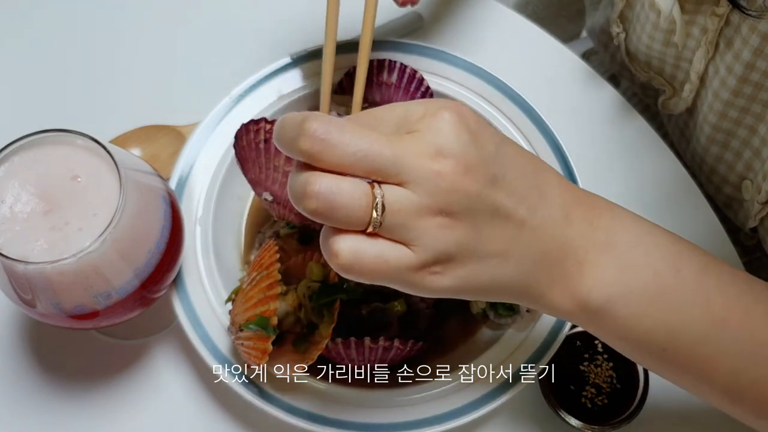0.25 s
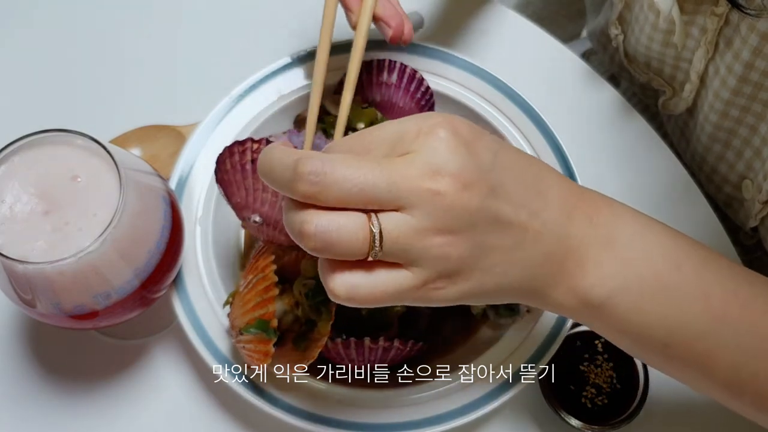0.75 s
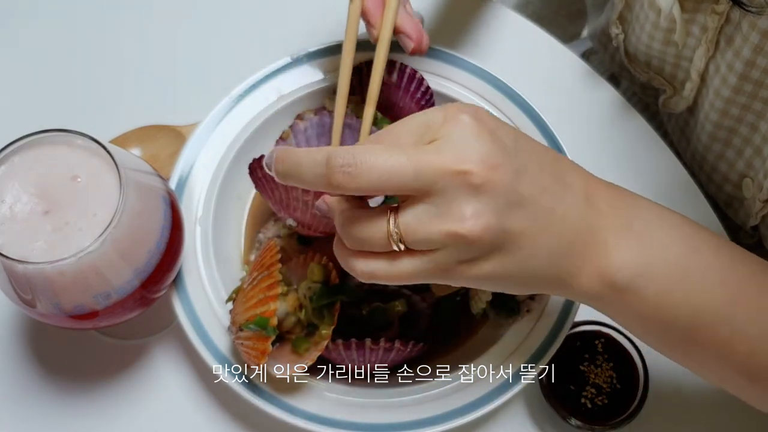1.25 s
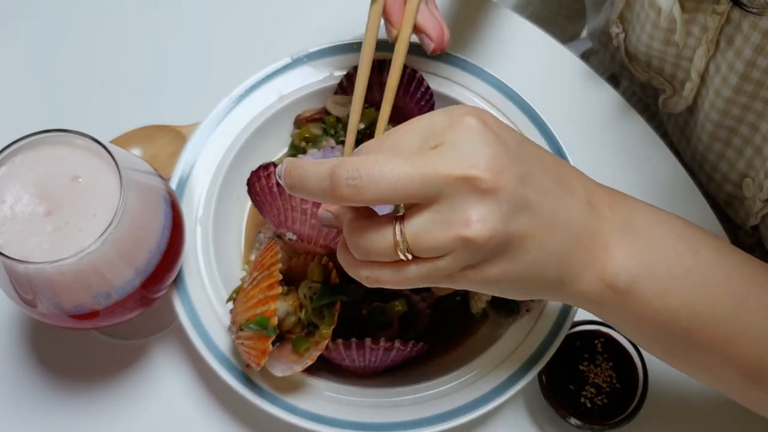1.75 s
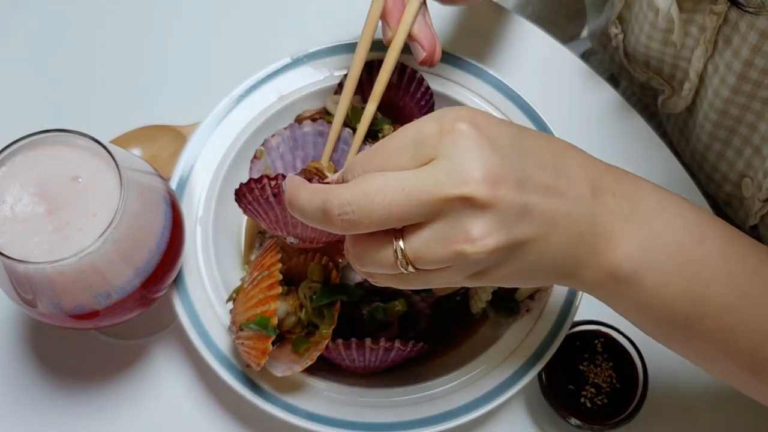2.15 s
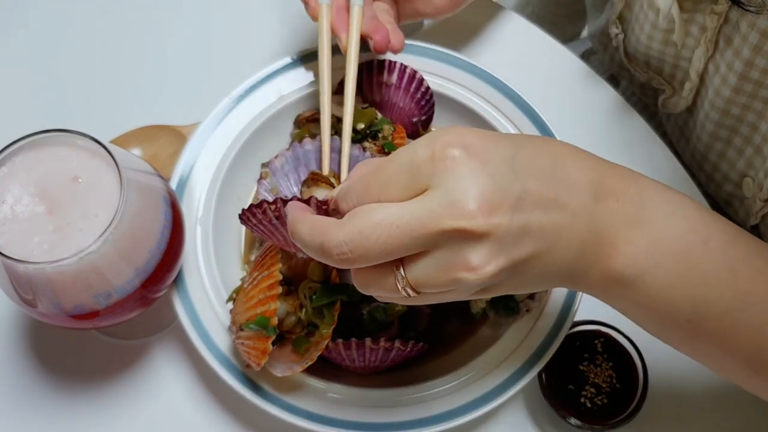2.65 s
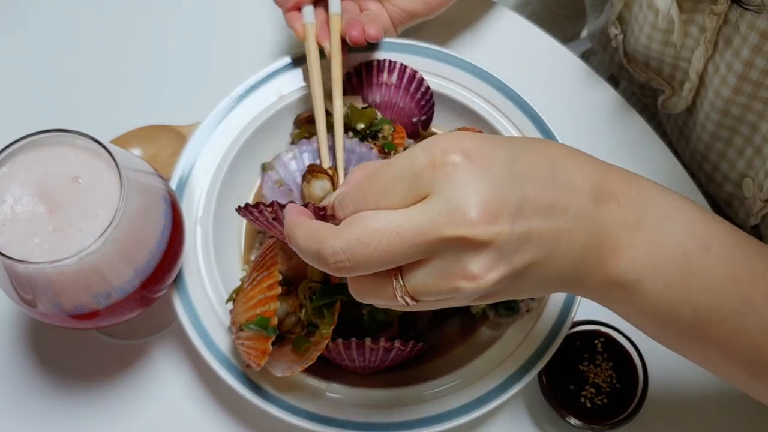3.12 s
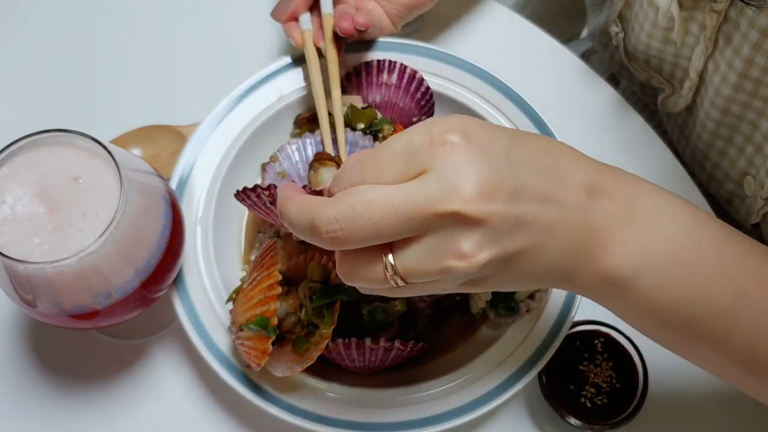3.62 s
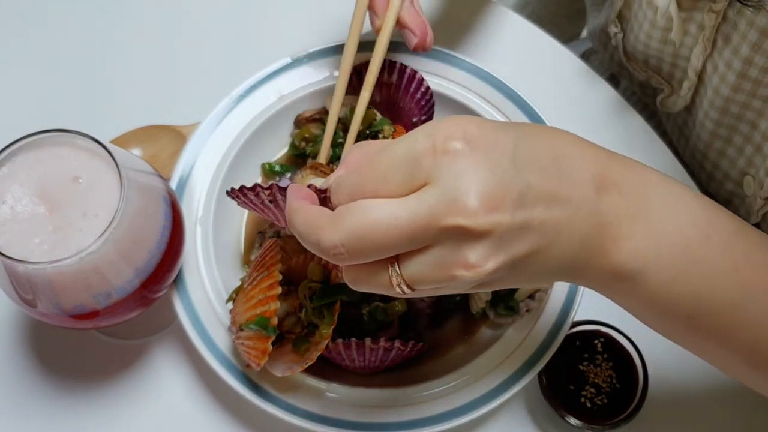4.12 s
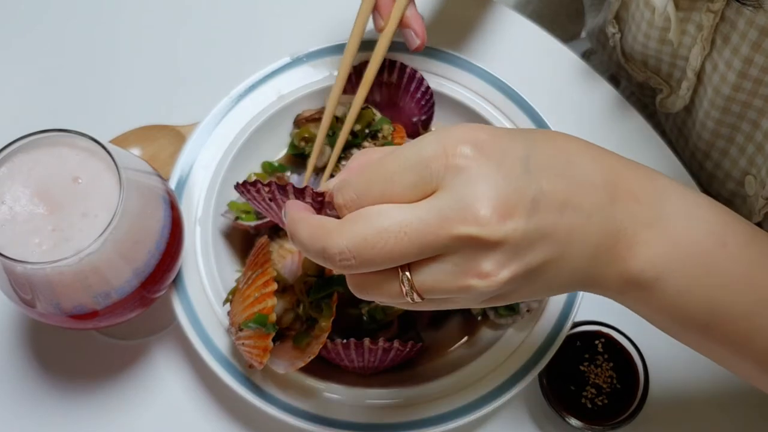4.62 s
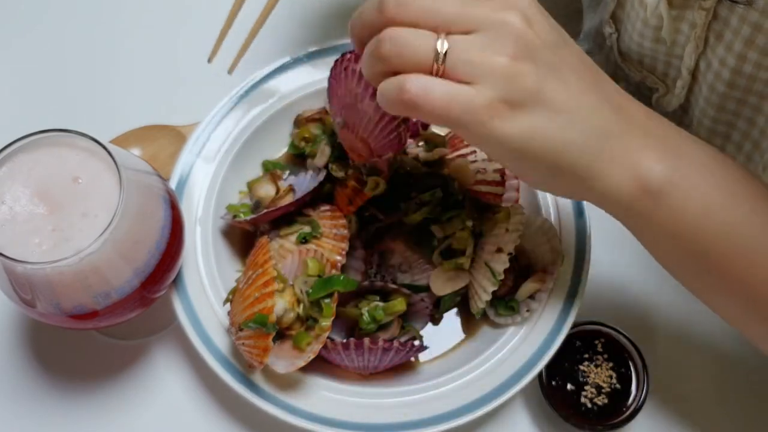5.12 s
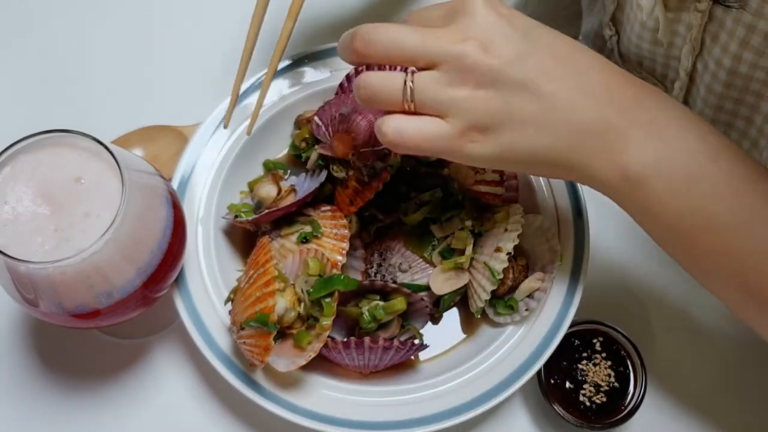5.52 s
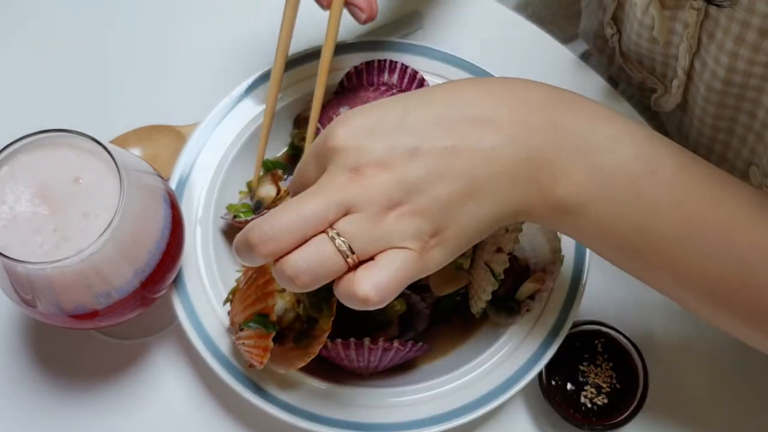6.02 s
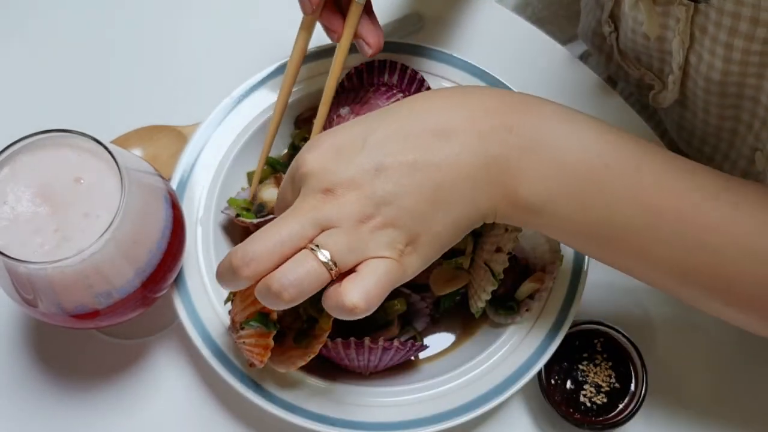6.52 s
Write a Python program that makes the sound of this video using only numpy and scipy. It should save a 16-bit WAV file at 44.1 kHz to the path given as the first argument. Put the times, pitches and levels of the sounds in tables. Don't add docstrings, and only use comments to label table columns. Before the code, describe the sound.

A close stereo microphone hears shellfish shells on a ceramic plate, slightly left, in a small room with a very short answer. Faint room air, hiss, low hum and a thin far appliance whine continue throughout. From 0.5 to 0.9 s there are dull, woody clacks and a short drag. Light rim ticks follow near 1.3 s, with a tiny chirp at 1.76 s, then barely audible nudges until a clearer tick at 3.1 s. The hum swells briefly at 3.3 s. From 3.95 to 4.25 s bright ticks, ratcheting scrapes and hard clacks crowd together, and the loudest, sharp shell crack lands at 4.33 s with an instant rebound. A faint nudge follows at 4.65 s. Crisp ticks and small knocks come at 5.1 s, a strong bright clack at 5.46 s, then soft clacks at 6.2 and 6.4 s and slow rustling taps near 6.7 s.

```python
import sys
import numpy as np
from scipy import signal
from scipy.fft import rfft, irfft, next_fast_len
from scipy.io import wavfile
from scipy.ndimage import map_coordinates

SR = 44100
rng = np.random.default_rng(int(sys.argv[2]) if len(sys.argv) > 2 else 0)


def put_to_file(sound):
    columns = np.atleast_2d(sound).T
    safe = np.clip(columns, -1, 1)
    whole_steps = np.round(safe * 32767)
    wavfile.write(sys.argv[1], SR, whole_steps.astype(np.int16))


def elevation(decibels):
    levels = np.asarray(decibels, float)
    return 10 ** (levels / 20)


N = 298116
LAG = 6
PLATE_PAN = elevation([[2.2], [-2.2]])


def unit(x):
    return x / np.sqrt(np.mean(x ** 2) + 1e-20)


def along(points, hz):
    f, v = np.transpose(points)
    return np.interp(np.log(hz + 1), np.log(f + 1), v)


def wobble(rate):
    knots = rng.standard_normal(int(N * rate / SR) + 4)
    return map_coordinates(knots, [np.arange(N) * rate / SR])


def filtered(x, response):
    m = next_fast_len(N + SR // 2)
    return irfft(rfft(x, m) * response(np.fft.rfftfreq(m, 1 / SR)), m)[..., :N]


def resonances(peaks):
    def response(f):
        total = 0
        for k, (centre, width, db) in enumerate(peaks):
            band = 1j * f * width / (centre * centre - f * f + 1j * f * width)
            total = total + (-1) ** k * elevation(db) * band
        return total
    return response


# frequency in Hz, left-right likeness (1 = same).
LIKENESS = [(60, 0.97), (180, 0.41), (550, -0.46), (1650, 0.05), (4970, -1.1), (15000, 0.34)]


def rush(spectrum):
    below, above = (spectrum[0][0] * .8, -120), (spectrum[-1][0] * 1.05, -120)
    closed = [below] + list(spectrum) + [above]

    def mid_side(hz):
        turn = np.arccos(np.clip(along(LIKENESS, hz), -2 / 3, 1)) / 2
        return elevation(along(closed, hz)) * [np.cos(turn), np.sin(turn)]

    mid, side = filtered(rng.standard_normal((2, N)), mid_side)
    return np.array([mid + side, mid - side]) / np.std(mid)


# frequency in Hz, level in dB per Hz.
AIR_COLOUR = [(140, -12.5), (235, -12), (275, -27), (387, -24.5), (464, -19), (640, -17), (720, -21),
              (932, -32.5), (1650, -36), (1920, -29.5), (2250, -34), (4160, -37.5), (14900, -40.5),
              (16300, -52)]
RUMBLE_COLOUR = [(15, -30), (30, -22.5), (45, -15.5), (60, 0), (85, -5), (110, -22)]
HUM_COLOUR = [(80, -26), (100, -8), (118, 4.5), (140, -7), (170, -25.5)]
# frequency in Hz, level in dB rms.
MOTOR_LINES = [(559.9, -88), (646.0, -78.5), (1292, -102), (1351, -100), (2013, -100)]
# time in seconds, width in seconds, hum gain in dB, rumble gain in dB.
TABLE_LEANS = [
    (.86, 0.059, -1, 12),
    (2.9, 0.14, 3.5, 4),
    (3.319, 0.098, 17, -0.5),
    (4.1, .1, 7, 9.5),
    (4.35, .15, 7, 7),
    (5.0, .1, -3.5, 5),
    (5.35, 0.16, 9, 4),
    (6.34, .2, -0.5, 4.5),
]
# frequency in Hz, left over right in dB.
BACKGROUND_BALANCE = [(60, -0.5), (300, -0.5), (700, 2.5), (8000, 2.5)]


def background():
    t = np.arange(N) / SR
    s, width, *gains_db = np.transpose(TABLE_LEANS)
    hum_db, rumble_db = gains_db @ np.exp(-((t - s[:, None]) / width[:, None]) ** 2)
    air = elevation(-76 + 0.4 * wobble(2.3)) * rush(AIR_COLOUR)
    hum = elevation(-72.5 + hum_db + wobble(8)) * rush(HUM_COLOUR)
    rumble = elevation(-73 + rumble_db + 1.0 * wobble(6)) * rush(RUMBLE_COLOUR)
    whine = 0
    for hz, db in MOTOR_LINES:
        level = np.sqrt(2) * elevation(db + 1.5 * wobble(10))
        whine = whine + level * np.sin(2 * np.pi * hz * t + .4 * wobble(12))
    balance = lambda hz: elevation(along(BACKGROUND_BALANCE, hz) * [[.5], [-.5]])
    return filtered(air + hum + rumble + whine, balance)


# frequency in Hz, t60 in seconds.
ROOM_DECAY = [(200, 0.22), (1000, 0.1), (4000, 0.083), (12000, 0.08)]


def tail(wet_db):
    far_db, far_times = -16, 2.9
    hz, t, z = signal.stft(rng.standard_normal((2, SR // 4)), SR, nperseg=256)
    fall_db = -60 * t / along(ROOM_DECAY, hz)[:, None]
    z = z * (elevation(fall_db) + elevation(far_db + fall_db / far_times))
    h = signal.istft(z, SR, nperseg=256)[1]
    h = h * (1 - np.exp(-np.arange(h.shape[1]) / SR / 0.001))
    return elevation(wet_db) * h / np.linalg.norm(h[0])


def held(s, length, t):
    swell_s, release_s, fall_db = .012, .015, 21
    early = np.clip(s - t, 0, None) / swell_s
    late = np.clip(t - s - length, 0, None) / release_s
    return -fall_db * (early + late)


# start in seconds, length in seconds, body level in dB,
# edge in dB over body, plate in dB over body.
SLIDE_STROKES = [
    (0.654, 0.052, -58, -17, -2.5),
    (0.757, 0.038, -46.5, -18, -0.5),
    (3.974, 0.027, -46, 2, -5.5),
    (4.012, 0.062, -45.5, -4.5, -6.5),
    (4.086, 0.031, -45, -0.5, -1.5),
    (4.198, .014, -40, -1, 1.5),
    (5.11, .028, -61.5, -11, 11),
    (6.174, 0.016, -62, -7, 5.5),
    (6.368, 0.065, -70, -8.5, 7.5),
    (6.696, 0.077, -68, -11, -10.5),
]
# start in seconds, time to rest in seconds, body level in dB,
# edge in dB over body, plate in dB over body.
SETTLE_STROKES = [(0.001, .14, -69.5, -5, -3), (0.512, .08, -55.5, -15, -2.5),
                  (0.786, .012, -33.5, -15.5, -6.5), (.812, .03, -47, 1, 5.5), (1.263, .05, -64, 5, -20),
                  (1.767, .3, -81.5, 3, 0), (2.649, .3, -80.5, 2, 17.5), (2.978, .055, -77, 14, 15),
                  (4.165, .03, -39, -10.5, 10), (4.212, .055, -33, -3.76, -1),
                  (5.146, .045, -51, -6.5, 3.5), (5.45, .014, -34.5, 1.5, -10.5),
                  (6.192, .05, -61.5, -5.5, 14)]


def stroke(part):
    t = np.arange(N) / SR
    gain = np.zeros(N)
    for s, length, db, *over_body in SLIDE_STROKES:
        gain += elevation(db + [0, *over_body][part] + held(s, length, t))
    for s, rest, db, *over_body in SETTLE_STROKES:
        fall_db = 22.5 * abs(t - s) / rest
        gain += (t > s) * elevation(db + [0, *over_body][part] - fall_db)
    return gain


def grit(rate, size_db, shared):
    chance = rate / SR * elevation(2.3 * wobble(90))
    hits = (rng.random(N) < chance) * elevation(size_db * rng.random(N))
    common, *own = rng.standard_normal((3, N))
    pair = hits * (np.sqrt(shared) * common + np.sqrt(1 - shared) * np.array(own))
    return np.array([pair[0], np.roll(pair[1], LAG)])


# frequency in Hz, width in Hz, level in dB.
BODY_RUB = [(1210, 800, -7.5), (2250, 710, -0.5)]
EDGE_RUB = [(3697, 440, -7.5), (4730, 840, -4.5), (6540, 680, -3.8), (8800, 620, -2.5), (11000, 2000, -4),
            (14300, 2700, -6)]
PLATE_RUB = [(194.8, 20, 0.5), (510, 150, -4), (810, 200, -1)]
# start in seconds, length in seconds, level in dB.
FINGER_SQUEAKS = [
    (1.762, .008, -74.5),
    (5.257, 0.041, -79.5),
]


def rubs():
    t = np.arange(N) / SR
    body_twice = lambda f: resonances(BODY_RUB)(f) ** 2
    body = unit(filtered(grit(2000, size_db=9, shared=0.88), body_twice)) * stroke(0)
    edge = unit(filtered(grit(2100, size_db=9, shared=0.17), resonances(EDGE_RUB))) * stroke(1)
    plate = unit(filtered(grit(2800, size_db=3, shared=1.0), resonances(PLATE_RUB))) * stroke(2)
    squeak = unit(filtered(grit(3600, size_db=-1, shared=0.75), resonances([(8460, 318, 0)])))
    squeak = squeak * sum(elevation(db + held(s, length, t)) for s, length, db in FINGER_SQUEAKS)
    dry = (elevation(-4.5) * body + elevation(1.0) * edge + elevation(-9.5) * plate + squeak) * PLATE_PAN
    return dry + signal.fftconvolve(dry, tail(wet_db=-14), axes=1)[:, :N]


def ring(modes, rise, scatter_db, apart_db):
    f, level, t60 = np.transpose(modes)[:, :, None]
    t = np.arange(int(SR * min(1 / 12, 1.25 * t60.max()))) / SR
    phase = 2 * np.pi * rng.random(f.shape)
    waves = np.sin(2 * np.pi * f * t + phase) * elevation(-60 * t / t60) * (1 - np.exp(-t / rise))
    blow_db = level.T + rng.normal(0, scatter_db, len(f))
    pair = elevation(blow_db + apart_db * rng.standard_normal((2, len(f)))) @ waves
    pair = np.pad(pair, ((0, 0), (0, SR // 12 - len(t))))
    return pair / np.linalg.norm(pair, axis=1)[:, None]


def add(out, s, hit, heavy, wet_db):
    sound = signal.fftconvolve(PLATE_PAN * (hit + elevation(-5.5) * heavy), tail(wet_db), axes=1)
    sound[:, :hit.shape[1]] += PLATE_PAN * hit + elevation([[1.2], [-1.2]]) * heavy
    at = round(s * SR)
    out[0, at:][:sound.shape[1]] += sound[0]
    out[1, at + LAG:][:sound.shape[1]] += sound[1]


# frequency in Hz, level in dB, t60 in seconds.
HELD_MODES = [(1417, .1, .04), (1550, -4.5, 0.044), (1820, -12.5, 0.054), (2195, 0.44, 0.031),
              (2330, -3.5, 0.035), (2520, -4, 0.021), (2705, -2, .03), (3130, -12, 0.036),
              (3560, -10, 0.06), (4010, -13.5, 0.073), (4400, -13, .05), (4730, -10.5, .05)]
LAID_MODES = [(2050, -10, .05), (2500, 3.5, 0.028), (3024, 2, 0.038), (3500, 1.5, .045), (4330, -8, .1),
              (4750, -16.5, 0.036), (4970, -17.5, .11), (6750, -16, .04), (7420, -11.5, .06),
              (8400, -17.5, .04)]
# start in seconds, level in dB.
HELD_HITS = [
    (.7821, -30),
    (4.1566, -24.5),
    (4.2215, -27.5),
    (4.3252, -7.5),
    (4.333, -13.5),
    (4.6491, -56),
    (6.1671, -38.5),
    (6.1871, -44),
    (6.4233, -47.5),
]
LAID_HITS = [
    (5.4464, -44),
    (5.462, -11.5),
    (5.4745, -23.5),
]


def whole_shells():
    out = np.zeros((2, N + SR))
    for modes, hits in ((HELD_MODES, HELD_HITS), (LAID_MODES, LAID_HITS)):
        for s, db in hits:
            sound = ring(modes, rise=0.00027, scatter_db=1.0, apart_db=5.5)
            add(out, s, elevation(db + 15) * sound, 0, wet_db=-13.5)
    return out[:, :N]


# start in seconds, bowl peak in dB, favoured mode in Hz,
# hardness in dB, weight on the plate in dB.
GRAZE_HITS = [
    (4.303, -61, 11000, 10.5, 1.3),
    (4.3148, -37.5, 2417, -3, -6),
]
CLACK_HITS = [(0.5062, -43, 1370, -19.5, 2), (0.6079, -44, 2660, -12, -7.5), (0.7603, -43, 1210, -28, -0.5),
              (0.7821, -28, 2250, -25, -10.5), (0.8038, -32, 2480, -3, -13.5), (4.0187, -32, 2120, -4, -16),
              (4.1566, -16, 2280, -12, -8), (4.1754, -35.5, 2147, -15, 3),
              (4.2215, -16.5, 2260, -11.5, -12), (4.2625, -41.5, 1520, 1, -11.5),
              (4.3252, -10.5, 2263, -4.5, -16.5), (4.334, -23.5, 1456, -9, -4),
              (5.1571, -43, 1057, -12.5, -16), (5.1856, -35.5, 1230, -21, -6),
              (5.462, -17, 2900, -2.5, -25), (6.1671, -37, 2267, -20.5, -17),
              (6.1871, -35.5, 1530, -19, -6), (6.4085, -45, 1388, -22.5, -1),
              (6.4234, -34.5, 1706, -29, -5)]
NUDGE_HITS = [(0.538, -52, 2300, -9, 4), (0.6646, -47.5, 2320, -14, -26), (1.4148, -63, 1910, 1.5, -18),
              (1.8272, -64.5, 1520, -6, -8), (2.0187, -59.5, 1810, -3, -18), (2.6454, -66, 1330, 2.5, 13.5),
              (2.7284, -61, 980, -3, 15), (2.8711, -64.5, 1810, -10, -2),
              (4.6491, -46.5, 1500, -25.5, -16.5), (6.3683, -56.5, 1430, -22.5, -1),
              (6.6794, -53.5, 1250, -16, -9), (6.6884, -49.5, 2117, -10.5, -6.5),
              (6.7466, -58.5, 2080, -10.5, -7.5)]
CATCH_HITS = [
    (2.2007, -69, 3920, 8.5, -16),
    (2.2465, -65.5, 4400, -1.5, -15.5),
    (4.0848, -46.5, 4700, 0.5, -13.5),
    (4.2088, -26.5, 3545, -4, -14),
    (5.4469, -33.5, 3090, -4.5, -30),
    (5.4732, -30.5, 2980, -4, -11),
    (6.1305, -83, 4460, 7, -6),
]
# start in seconds, bowl peak in dB, favoured mode in Hz, hardness in dB.
TICK_HITS = [(0.867, -64, 6600, 8), (0.8932, -57.5, 7050, 8), (1.256, -55, 6500, 2),
             (1.266, -59.5, 6700, -3), (1.276, -61, 10900, 12.5), (1.3674, -45, 7550, 5),
             (1.68, -86.5, 10800, 17), (1.7647, -62, 8460, -10), (1.878, -79, 10400, 9),
             (2.2958, -64.5, 8700, 11), (2.697, -87, 11570, 13), (2.713, -75, 11900, 14),
             (2.9746, -74.5, 10900, 17), (2.981, -69, 10600, -10), (3.029, -82.5, 6800, 19),
             (3.053, -79, 7650, 21.5), (3.0853, -56, 7200, 19), (3.0986, -36.5, 7850, 10.5),
             (3.677, -71, 8600, 9.5), (3.9626, -29.5, 8360, 6.5), (3.986, -38, 9450, 6),
             (4.1103, -35, 9150, -4.5), (4.115, -49.5, 8800, 14.5), (4.1942, -30.5, 10080, 8),
             (4.5281, -61, 11130, 11), (5.1025, -28.5, 6585, -5), (5.132, -43.5, 11900, -2.5),
             (6.0354, -63, 7300, 10)]


def contacts():
    ticks = [(*row, -19) for row in TICK_HITS]
    kinds = [(CLACK_HITS, -1.5), (NUDGE_HITS, -8), (CATCH_HITS, 3), (ticks, -11.5), (GRAZE_HITS, -11.5)]
    found = []
    for rows, ribs_db in kinds:
        for s, db, hz, hard_db, weight_db in rows:
            found.append((s, db, hz, hard_db + ribs_db, hard_db, weight_db))
    return sorted(found)


def crowd(span, hz, tilt_db, count):
    lo, hi, short, long = span
    u = rng.random((count, 2))
    place = (np.arange(count) + u[:, 0]) / count
    linger = u[:, 1] ** 2
    rows = np.c_[lo + (hi - lo) * place, tilt_db * place - 9 * linger, short * (long / short) ** linger]
    favoured = (hz, -1.5 if lo < hz < hi else -60, 0.91 * long)
    return np.r_[rows, [favoured]]


# lowest in Hz, highest in Hz, shortest t60 in seconds, longest t60 in seconds.
BOWL_SPAN = (1050, 3300, 0.0062, 0.021)
RIB_SPAN = (2800, 5600, .006, 0.023)
RIM_SPAN = (5400, 16000, 0.0044, 0.021)
# frequency in Hz, level in dB, t60 in seconds.
PLATE_MODES = [(188, -6, .11), (204.3, 8, 0.058), (323, -41, 0.0481), (389.4, -2.5, 0.095),
               (432, -5, 0.066), (515, 9, 0.038), (673, -12, 0.044), (744, 1.5, 0.027), (870, -16.5, 0.034)]


def knocks():
    out = np.zeros((2, N + SR))
    for s, db, hz, ribs_db, rim_db, thud_db in contacts():
        soft_db = np.clip(ribs_db + 7.5, -20, 0)
        bowl_modes = crowd(BOWL_SPAN, hz, tilt_db=-2.5, count=16)
        focus_hz = hz if hz < BOWL_SPAN[1] else 2100
        octaves = np.log2(bowl_modes[:, :1] / focus_hz)
        bowl_modes = bowl_modes - 13 * octaves ** 2 * [0, 1, 0]
        rib_modes = crowd(RIB_SPAN, hz, tilt_db=.4 * soft_db, count=20)
        rim_modes = crowd(RIM_SPAN, hz, tilt_db=-5, count=44)
        bowl = ring(bowl_modes, rise=.0003, scatter_db=1, apart_db=2)
        ribs = ring(rib_modes, rise=.0003, scatter_db=1, apart_db=2.5)
        rim = ring(rim_modes, rise=.0003, scatter_db=1, apart_db=3)
        thud = ring(PLATE_MODES, rise=.002, scatter_db=2.5, apart_db=1)
        hit = bowl + elevation(ribs_db + 7.0) * ribs + elevation(rim_db + 1.5) * rim
        add(out, s, elevation(db + 13.5) * hit, elevation(db + thud_db + 20.0) * thud, wet_db=-6)
    no_deep_bass = lambda f: (1j * f / (130 + 1j * f)) ** 2
    return filtered(out[:, :N], no_deep_bass)


def scene():
    return background() + rubs() + whole_shells() + knocks()


def band_limit(x):
    return signal.sosfilt(signal.butter(12, 16820, fs=SR, output="sos"), x)


def record(dry):
    limited = dry / (1 + np.abs(dry / .9) ** 6) ** (1 / 6)
    mix = filtered(limited, lambda hz: 1 / (1 + (hz / 16350) ** 60))
    return band_limit(mix)


dry = scene()
out = record(dry)
put_to_file(out)
```